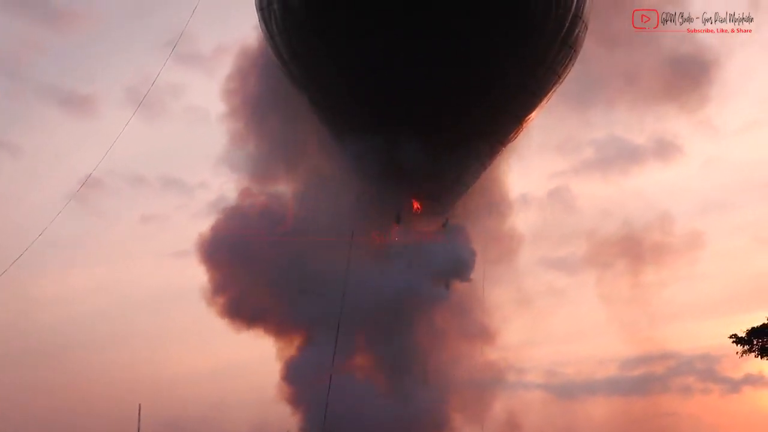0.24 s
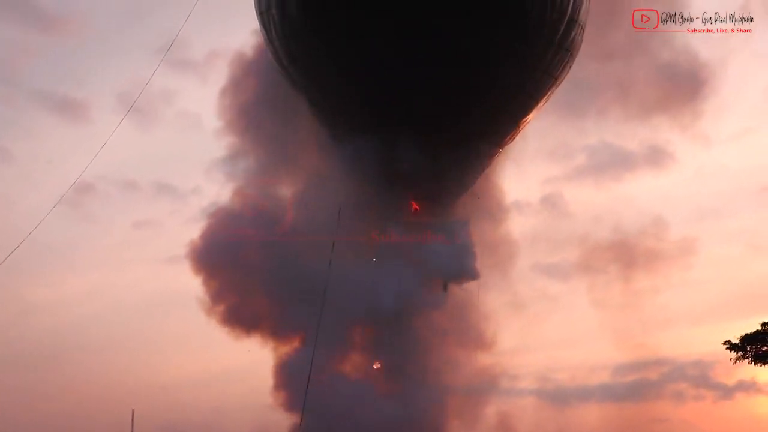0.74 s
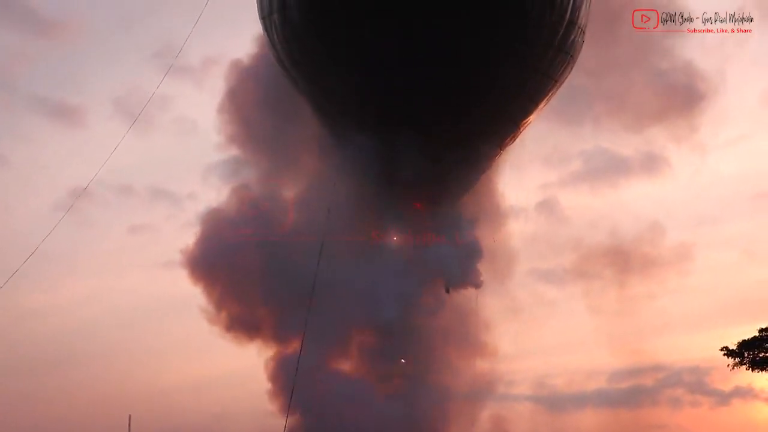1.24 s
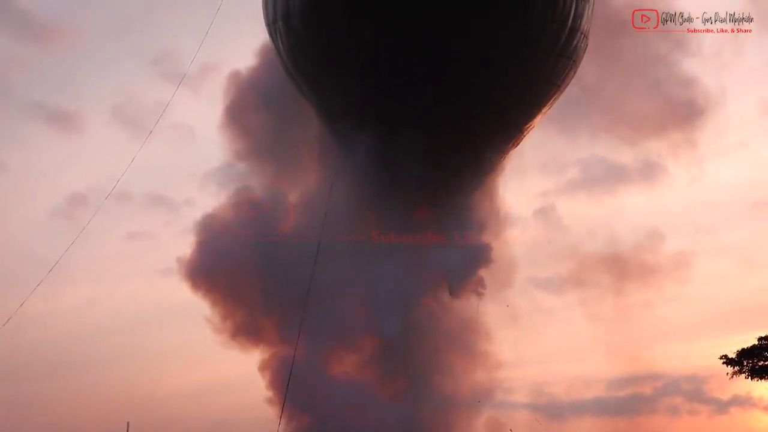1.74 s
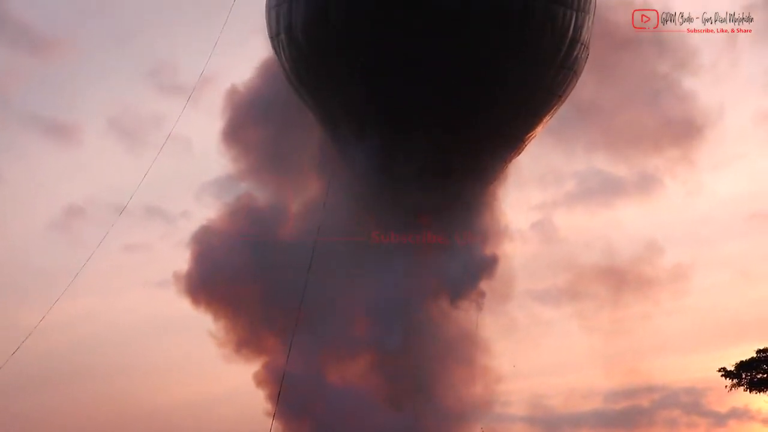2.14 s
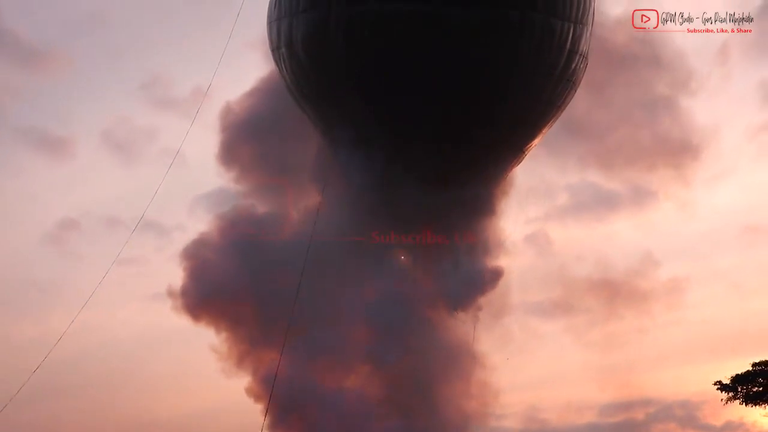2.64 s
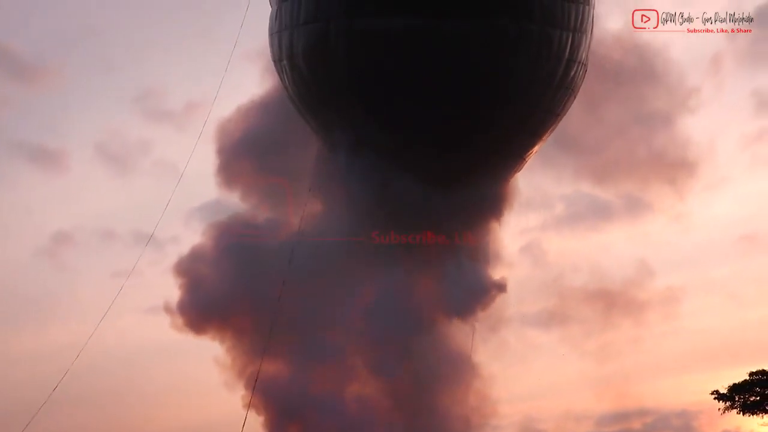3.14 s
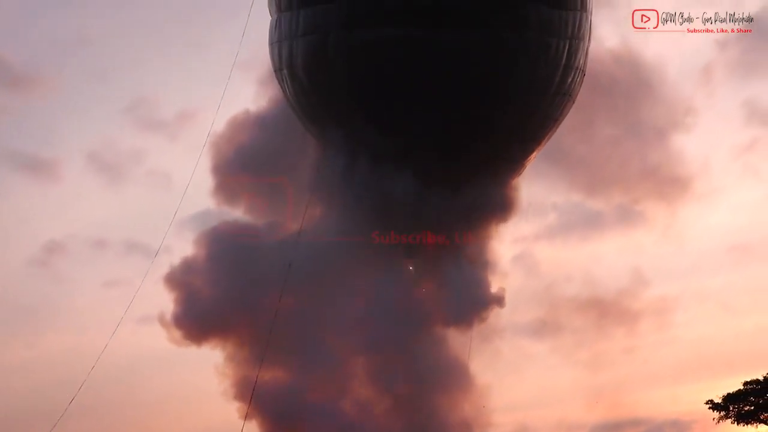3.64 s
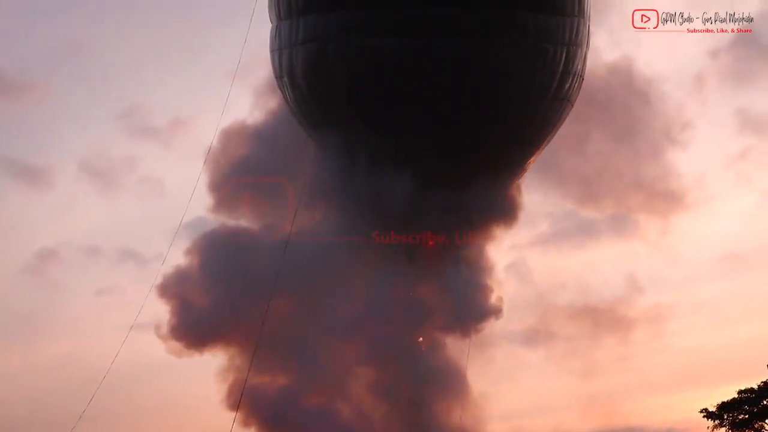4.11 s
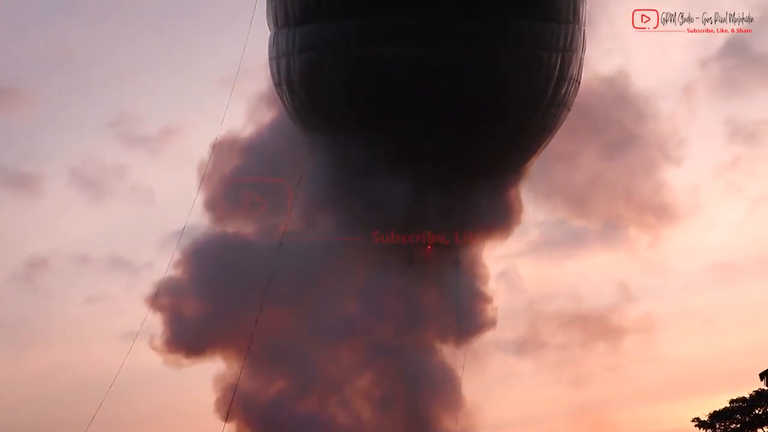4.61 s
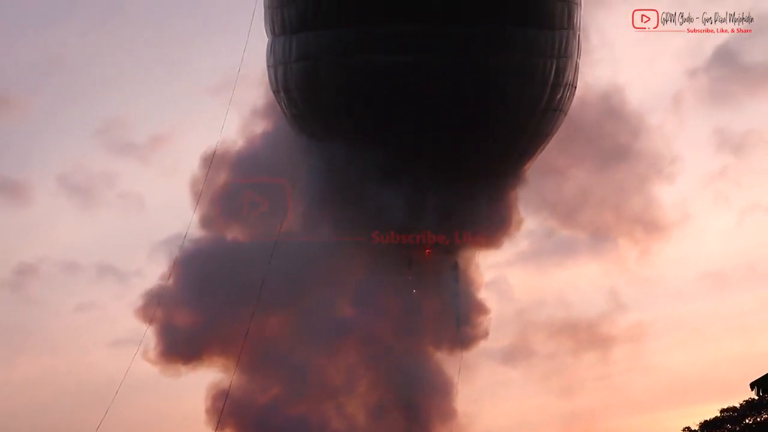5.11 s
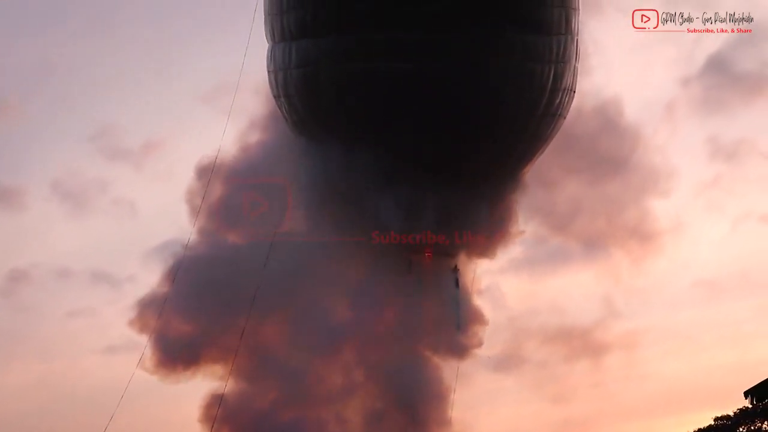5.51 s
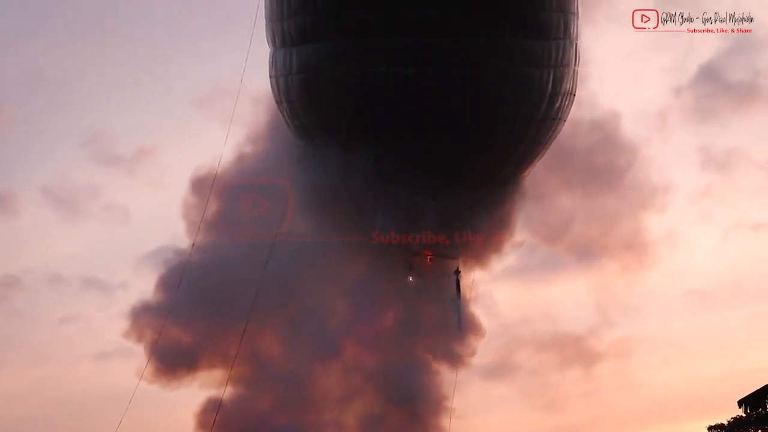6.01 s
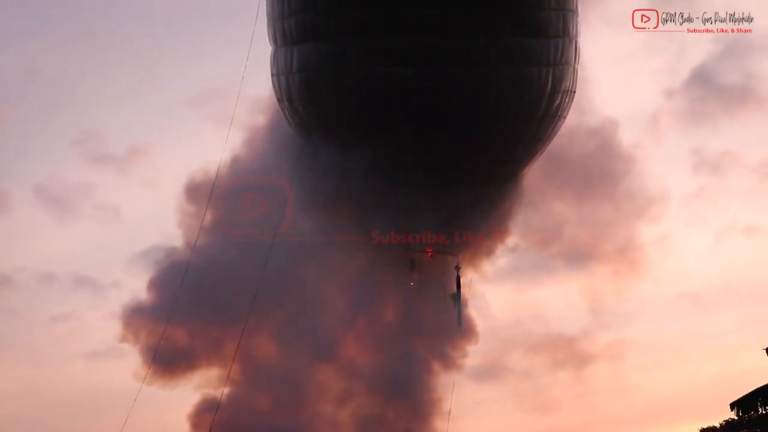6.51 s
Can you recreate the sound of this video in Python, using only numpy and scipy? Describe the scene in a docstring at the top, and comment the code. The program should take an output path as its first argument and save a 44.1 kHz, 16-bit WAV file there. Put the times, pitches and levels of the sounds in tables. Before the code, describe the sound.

Firecracker strings explode over an open field in uneven volleys. Each bang has a sharp snap, a short hollow thump and a little low push, followed by slapback and a grainy, quickly fading scatter of echoes. The opening is busy, the middle thins to separate pops, then a dense burst hits around four seconds and clusters continue to the end. The microphone slightly overloads on the loudest peaks; only a faint outdoor wash lies beneath.

```python
"""Strings of firecrackers go off in ragged volleys over an open field, thickest around four seconds.
Each blast starts with a sharp shock front, then a short swinging thump, a deep push and a ground bounce.
A slap, a few echoes and a grainy tail of scattered sound follow, and sink into a faint outdoor wash.
The microphone overloads on the loudest peaks, and a noise suppressor turns down what is very quiet."""
import sys
import numpy as np
from scipy import signal
from scipy.io import wavfile
from scipy.ndimage import uniform_filter1d

SR = 44100
rng = np.random.default_rng(int(sys.argv[2]) if len(sys.argv) > 2 else 0)


def master(y):
    """Save y as 16-bit WAV."""
    cut = np.clip(np.atleast_2d(y).T, -1, 1)
    pcm = np.round(cut * 32767)  # scale
    wavfile.write(sys.argv[1], SR, pcm.astype(np.int16))


N = 298116
BLAST = np.arange(2048) / SR  # the clock of one short blast sound (s)
BLAST_WINDOW_S = .005  # blast levels are energies spread over this time


def amp(db):
    """Turns decibels into a gain."""
    return 10 ** (np.asarray(db) / 20)


def read(points, hz):
    """Reads a table between its rows, on a log-frequency axis."""
    f, value = np.transpose(points)
    return np.interp(np.log(hz + 1), np.log(f + 1), value)


def add(mix, s, sound):
    """Adds a sound to the mix at s seconds."""
    part = mix[max(round(s * SR), 0):][:len(sound)]
    part += sound[:len(part)]


def at_level(x, db):
    """Scales a short sound so that its energy equals db held over the blast window."""
    return amp(db) * x * np.sqrt(BLAST_WINDOW_S * SR / (np.sum(x ** 2) + 1e-20))


def causal(x, gain_db):
    """Minimum-phase filter from gains round the whole frequency circle: nothing sounds before the blow."""
    log_gain = np.log(amp(gain_db))
    response = np.exp(np.conj(signal.hilbert(log_gain)))
    taps = np.fft.ifft(response).real[:len(gain_db) // 2]
    return signal.fftconvolve(x, taps)[:len(x)]


def colour(x, points, size=2048):
    """Filters a sound with the gains in a table."""
    return causal(x, read(points, abs(np.fft.fftfreq(size, 1 / SR))))


def butter(x, order, hz, kind):
    """Filters a sound with a smooth low, high or band pass."""
    return signal.sosfilt(signal.butter(order, hz, kind, fs=SR, output="sos"), x)


# colour of the distant outdoor wash: (f/Hz, relative level/dB per Hz)
WASH_COLOUR = [(30, -14.5), (120, -17), (350, -4), (850, -2.5), (1200, -18), (3500, -18.5), (5500, -37),
               (7500, -64), (16000, -79)]


def wash(level_db=-48, swell_rms_db=2):
    """Faint noise of the open field, slowly swelling as eight slow waves add up."""
    t = np.arange(N) / SR
    waves = [np.sin(2 * np.pi * (f * t + rng.random())) for f in np.geomspace(.3, 5, 8)]
    swell = sum(waves) / 2
    air = colour(rng.standard_normal(N), WASH_COLOUR) * amp(swell_rms_db * swell)
    return amp(level_db) * air / air.std()


# colour of the scattered sound: (f/Hz, relative level/dB per Hz)
SCATTER_COLOUR = [(40, -20.5), (150, -9.5), (450, 2.5), (620, -1), (880, 2.5), (1080, -5.5), (1400, -9),
                  (2900, -14), (3450, -11), (3900, -16), (5400, -21), (6800, -31.5), (9000, -26.5),
                  (16000, -39.5)]
# how long the field takes to fade by 60 dB: (f/Hz, t/s)
FIELD_FADE = [(60, 0.75), (350, 0.28), (800, 1), (1500, 0.64), (3500, 0.4), (7000, 0.35), (15000, 0.29)]


def scatter(near_db=3, near_s=0.033, cluster_db=-3, cluster_s=0.039, size=32768):
    """Echoes from many small surfaces: a near cluster, one further off, and a tail fading pitch by pitch."""
    t = np.arange(size) / SR
    strength = amp(4.2 * np.minimum(rng.exponential(1, size), 4.5))
    sizes = strength * (rng.random(size) < 4000 / SR)  # about 4000 echoes a second
    onset = 1 - np.exp(-t / .002)
    near = amp(near_db) * np.exp(-t / near_s)
    further = amp(cluster_db) * np.exp(-((t - cluster_s) / .012) ** 2)
    echoes = rng.standard_normal(size) * sizes * onset * (1 + near + further)
    hz, when, z = signal.stft(echoes, SR, nperseg=256)
    fade = amp(-60 * when / read(FIELD_FADE, hz)[:, None])
    tail = signal.istft(z * fade, SR, nperseg=256)[1]
    return colour(tail, SCATTER_COLOUR)


def slap(hz=1380, peak_s=0.0065):
    """A hollow slap comes back from a nearby surface, never quite at the same pitch."""
    hz = hz * rng.normal(1, .07)
    return np.sin(2 * np.pi * hz * BLAST) * BLAST / (2 * peak_s) * np.exp(-BLAST / peak_s)


def boom(low_hz=60, top_hz=330, decay_s=0.005, rise_s=0.0026):
    """Low rumble from the ground close by, just after a blast: filtered noise that swells and fades."""
    low = butter(rng.standard_normal(len(BLAST)), 2, [low_hz, top_hz], "band")
    return low * np.exp(-BLAST / decay_s) * (1 - np.exp(-(BLAST / rise_s) ** 2))


def shock(t, length):
    """Blast wave: a jump in pressure, then a longer suction."""
    u = np.maximum(t, 0) / length
    return (t >= 0) * (1 - u) * np.exp(-u)


def push(length_s=0.0013, low_hz=55, top_hz=220):
    """The deep part of the blast wave: a hump of pressure, then a long suction."""
    return butter(shock(BLAST, length_s), 1, [low_hz, top_hz], "band")


def ring(hz=750, decay_s=0.0036, spread=0.087, steep=5.4):
    """A hollow, quickly damped note that rides on the thump."""
    hz = hz * np.exp(spread * rng.standard_normal())
    return np.sin(2 * np.pi * hz * BLAST) * np.exp(-(BLAST / decay_s) ** steep)


def thump(hz, cycles=1.23, start=1.156, settle=0.97, low_hz=70):
    """The expanding gas swings the pressure about one and a half times, slowing as it goes."""
    age = BLAST * hz  # in cycles of the final pitch
    turns = age + (start - 1) * settle * (1 - np.exp(-age / settle))
    fade = np.exp(-(age / (cycles * rng.uniform(.85, 1.15))) ** 4)
    return butter(np.sin(2 * np.pi * turns) * fade, 1, low_hz, "high")


# colour of the shock front: (f/Hz, relative level/dB)
CRACK_COLOUR = [(100, -38), (700, -14.5), (1100, 1), (1450, 0.5), (2200, -4.5), (3400, -5), (5400, -15.5),
                (6700, -26.5), (8000, -13.5), (11000, -12.5), (13500, -21.5), (16000, -18.5)]


def crack(length_s=0.00019, ground_hz=5000, grit=0.12):
    """The shock front, its duller bounce off the ground and the grit of the bursting paper."""
    length_s = length_s * np.exp(0.11 * rng.standard_normal())
    bounce = butter(shock(BLAST - rng.uniform(.0008, 0.0022), length_s), 1, ground_hz, "low")
    shreds = grit * rng.standard_normal(len(BLAST)) * np.exp(-BLAST / .001)
    return colour(shreds - shock(BLAST, length_s) - .5 * bounce, CRACK_COLOUR)


# typical depth of the humps and dips in a casing's colour: (f/Hz, level/dB)
CASING_HUMPS = [(500, 0.5), (1400, 4.5), (2500, 7), (8000, 7.5), (16000, 4)]
# how much of a crack's brightness each pitch takes: (f/Hz, share)
BRIGHT_SHARE = [(1800, 0), (4500, 1)]
# how much of the drifting treble level each pitch takes: (f/Hz, share)
AIR_SHARE = [(4000, 0), (9000, 1)]


def tint(bright_db, hollow_db, treble_db, dip_db=-18, peak_db=6, hollow_hz=790, hollow_width_hz=220, size=1024):
    """No two casings burst alike: treble tilts, a hollow hump, and random humps and dips (all in dB)."""
    hz = abs(np.fft.fftfreq(size, 1 / SR))
    knots = np.cumsum(rng.uniform(140, 400, 100))  # pitches of the humps and dips (Hz)
    humps_db = read(CASING_HUMPS, knots) * rng.standard_normal(len(knots))
    humps_db = np.clip(humps_db, dip_db, peak_db)
    hollow = np.exp(-((hz - hollow_hz) / hollow_width_hz) ** 2)
    tilt_db = bright_db * read(BRIGHT_SHARE, hz) + treble_db * read(AIR_SHARE, hz)
    return np.interp(hz, knots, humps_db) + tilt_db + hollow_db * hollow


# an ordinary firecracker, against which the others are reckoned
USUAL_HZ, USUAL_THUMP_DB, USUAL_RING_DB, USUAL_CRACK_DB = 345, -9, -15, -17
# the deep push of an ordinary blast (dB), its growth per dB of thump, and per octave of lower pitch (dB)
PUSH_DB, PUSH_PER_THUMP, PUSH_DB_PER_OCTAVE = -23.5, 0.12, 11.5
BOOM_DB = 0  # ground rumble, against the push
# the scattered tail of an ordinary blast (dB), and its growth per dB of thump and per dB of crack
TAIL_DB, TAIL_PER_THUMP, TAIL_PER_CRACK = -16.5, 0.46, 0.27
# blasts in quick succession have weaker tails: by how much, and how soon that passes
CROWDED_DB, CROWDED_S = -4, 0.16
# one hard echo from close by: delay, level, share of the thump that returns
ECHO_S, ECHO_DB, ECHO_BODY = 0.017, -27.5, 0.8
# stray echoes of the crack: earliest and latest delay, level, and how fast they weaken with delay
STRAY_FROM_S, STRAY_TO_S, STRAY_DB, STRAY_FADE_S = 0.016, 0.15, -24.5, 0.052
# slow changes in what the surroundings send back: (t/s, tail level/dB, treble level/dB)
# the treble level colours the crack as well
SURROUNDINGS = [(0, 2, -1), (0.5, 1, -3.5), (1.1, 3.5, -5), (1.6, 0, 0), (2.3, 1, -1.5), (2.9, 3.5, -1.5),
                (3.4, -1, 2), (4.1, 2.5, 0.5), (4.7, 1.5, 0), (5.2, 1.5, -3), (5.8, 1.5, 1.5),
                (6.7, 0.5, 1)]
# one row a firecracker: (t/s, thump level/dB, thump f/Hz, hollow ring level/dB, crack level/dB)
FIRECRACKERS = [(0.0089, -4.5, 387, -19, -11), (0.012, -20, 430, -14.5, -35),
                (0.1041, -12.5, 280, -18, -17), (0.1876, -6, 344, -16.5, -15),
                (0.2034, -49, 275, -16, -19.5), (0.2456, -7.5, 326, -9, -11.5), (0.2749, -6, 294, -18, -10),
                (0.285, -16.5, 436, -23, -22), (0.3641, -3, 356, -27, -9.5), (0.3803, -32, 295, -28, -26),
                (0.4093, -10, 355, -12.5, -14.5), (0.4181, -10.5, 324, -19, -14.5),
                (0.4336, -14, 375, -10, -11), (0.438, -7.5, 315, -15, -13), (0.524, -22, 300, -38, -21),
                (0.5915, -6.5, 315, -10.5, -15), (0.6411, -8, 280, -11, -8.5),
                (0.646, -5.5, 386, -10, -12.5), (0.6663, -3, 345, -8, -8.5), (0.6858, -8, 370, -10, -10.5),
                (0.7002, -4.5, 347, -32, -10.5), (0.7595, -16, 312, -17.5, -17.5),
                (0.8098, -2.5, 300, -13, -12), (0.9236, -13.5, 303, -22, -24),
                (0.9499, -7, 366, -12, -16.5), (0.9546, -8, 358, -20, -14.5), (0.9709, -7, 383, -20, -11.5),
                (0.9827, -10.5, 347, -12, -16), (0.99, -13, 376, -26, -15),
                (1.0565, -12.5, 430, -11.5, -15.5), (1.0781, -2, 356, -26, -12.5),
                (1.108, -18, 424, -8.5, -13), (1.113, -11.5, 385, -14, -13),
                (1.3748, -7, 320, -22.5, -12.5), (1.4166, -5.5, 357, -15, -11.5),
                (1.482, -12, 338, -11, -12.5), (1.4846, -3.5, 335, -30, -9),
                (1.4994, -11.5, 370, -12.5, -13), (1.5208, -7.5, 395, -21, -10),
                (1.5297, -10.5, 271, -16, -16.5), (1.5866, -5, 360, -10, -8.5),
                (1.6115, -26, 325, -34, -18), (1.619, -9, 343, -13, -14), (1.6871, -8.5, 338, -11, -15),
                (1.8013, -18, 285, -20, -33.5), (1.86, -6.5, 323, -30, -21.5), (1.886, -6.5, 355, -10, -13),
                (1.917, -34, 350, -20, -21), (1.9298, -8.5, 370, -12, -18), (1.983, -18, 300, -24, -26),
                (2.0451, -7.5, 372, -18.5, -15), (2.1338, -8.5, 350, -23, -20),
                (2.2045, -20, 310, -30, -32.5), (2.2501, -22.5, 315, -40, -26.5),
                (2.2562, -5, 330, -24, -16.5), (2.3584, -11.5, 360, -24, -19), (2.391, -16, 345, -16, -20),
                (2.4372, -8.5, 400, -10, -17), (2.4592, -11.5, 440, -11, -17), (2.581, -7.5, 375, -9, -18),
                (2.7458, -16.5, 203, -28, -30.5), (2.7739, -14, 226, -47, -19.5),
                (2.7893, -32, 221, -31, -19), (2.827, -29, 240, -23, -17), (2.894, -11, 318, -9, -15.5),
                (2.9, -17.5, 272, -31, -21), (2.9636, -9, 392, -9, -12), (3.0114, -16, 380, -8.5, -16),
                (3.057, -10.5, 370, -11, -15.5), (3.0848, -31, 305, -18, -30),
                (3.1138, -7.5, 320, -10.5, -13.5), (3.1915, -10.5, 330, -12.5, -18.5),
                (3.203, -35, 300, -28, -46), (3.2276, -6, 325, -11.5, -15.5), (3.3711, -6, 285, -11, -16),
                (3.4777, -7, 296, -9.5, -13.5), (3.5425, -8, 413, -12, -15.5),
                (3.7283, -9.5, 328, -16, -17.5), (3.7995, -12.5, 370, -14.5, -15.5),
                (3.9435, -8.5, 335, -15, -18), (3.9646, -2, 374, -7.5, -8), (3.9907, -10, 310, -12, -12),
                (3.995, -4, 350, -11, -9), (4.0027, -7, 337, -12, -13), (4.0213, -6, 392, -12, -13),
                (4.037, -8.5, 388, -13, -8.5), (4.0416, -6.5, 325, -16, -10),
                (4.0614, -6.5, 366, -28, -13.5), (4.3077, -9.5, 246, -8.5, -8), (4.3283, -6, 395, -10, -10),
                (4.332, -13, 298, -7, -19), (4.3475, -14, 404, -18, -14), (4.3625, -6, 383, -33, -12.5),
                (4.3711, -3, 325, -14, -9), (4.5105, -9, 365, -14, -18.5), (4.5403, -15, 412, -14, -19),
                (4.5464, -18, 285, -13.5, -14.5), (4.5784, -5, 384, -13, -12.5),
                (4.588, -4.5, 380, -23, -12.5), (4.7118, -6.5, 373, -11.5, -17),
                (4.8729, -8.5, 402, -22, -19), (4.9082, -4.5, 353, -8, -11), (4.9641, -9, 373, -13, -18),
                (5.0447, -6.5, 357, -13, -16), (5.05, -14, 313, -16, -17.5), (5.0783, -7, 327, -12, -14),
                (5.1667, -16, 297, -13.5, -19.5), (5.2539, -11.5, 390, -22.5, -17.5),
                (5.3471, -8.5, 363, -13.5, -16.5), (5.4474, -7, 332, -14, -16),
                (5.4772, -12, 295, -19, -22), (5.5234, -6.5, 376, -15, -13.5),
                (5.5932, -6, 346, -13.5, -15), (5.6975, -5, 380, -43, -17), (5.702, -6, 317, -13.5, -18),
                (5.7119, -13, 363, -22, -24), (5.891, -20, 272, -19.5, -20.5), (5.9062, -8, 280, -22, -16),
                (5.9123, -6, 338, -9.5, -14), (5.9238, -7.5, 368, -9, -15), (5.9778, -11.5, 332, -16, -15),
                (5.992, -8, 384, -12, -12), (6.0012, -6, 396, -15, -14.5), (6.0521, -6.5, 358, -12.5, -14),
                (6.13, -6.5, 350, -13.5, -17), (6.1638, -6.5, 394, -10, -18),
                (6.2177, -8, 400, -7.5, -19.5), (6.3286, -9.5, 315, -18, -32.5),
                (6.3699, -5, 308, -21, -26.5), (6.5364, -12, 295, -18.5, -20),
                (6.5626, -6, 355, -19.5, -13.5), (6.6012, -7.5, 373, -13, -13),
                (6.6144, -3.5, 383, -26, -12), (6.6211, -23, 298, -23, -17.5),
                (6.646, -19, 317, -14.5, -14), (6.6499, -8.5, 346, -13, -14),
                (6.7146, -14.5, 323, -15, -16.5)]


def blasts(front_colour=1.0, slap_db=-17.0, snap_tilt=0.35, hollow_share=0.34,
           thump_lag_s=0.00023, push_lag_s=0.00044):
    """Every blast with its scattered tail, a slap, one hard echo from close by and a few stray ones."""
    out = np.zeros(N)
    tails = [scatter() for _ in range(24)]  # shared out in turn
    when, *drift = np.transpose(SURROUNDINGS)
    pauses = abs(np.diff([row[0] for row in FIRECRACKERS], prepend=-1))
    for k, (row, pause) in enumerate(zip(FIRECRACKERS, pauses)):
        s, thump_db, hz, ring_db, crack_db = row
        # how far this one departs from the ordinary (dB)
        heavier = thump_db - USUAL_THUMP_DB
        hollower = ring_db - USUAL_RING_DB
        sharper = crack_db - USUAL_CRACK_DB
        # lower-pitched blasts push more air
        deep_db = PUSH_DB + PUSH_PER_THUMP * heavier + PUSH_DB_PER_OCTAVE * np.log2(USUAL_HZ / hz)
        wet_db, treble_db = (np.interp(s, when, curve) for curve in drift)
        tail_db = TAIL_DB + TAIL_PER_THUMP * heavier + TAIL_PER_CRACK * sharper
        tail_db += CROWDED_DB * np.exp(-pause / CROWDED_S) + wet_db

        # a blast with little thump has a brighter snap
        casing = tint(snap_tilt * (sharper - heavier), hollow_share * hollower, treble_db)
        front = at_level(causal(crack(), front_colour * casing), crack_db)
        body = at_level(thump(hz), thump_db) + at_level(ring(), ring_db)
        deep = at_level(push(), deep_db) + at_level(boom(), deep_db + BOOM_DB)
        add(out, s, front)
        add(out, s + thump_lag_s, body)
        add(out, s + push_lag_s, deep)

        # the surroundings answer with the colour of the same casing
        add(out, s, at_level(causal(tails[k % len(tails)], casing), tail_db))
        add(out, s + rng.uniform(.015, .036), at_level(slap(), tail_db + rng.normal(slap_db, 3)))
        add(out, s + rng.normal(ECHO_S, .0005), amp(ECHO_DB) * (front + ECHO_BODY * body))
        delays = rng.uniform(STRAY_FROM_S, STRAY_TO_S, 4)
        for delay, size_db in zip(delays, rng.normal(STRAY_DB, 3, 4)):
            add(out, s + delay, amp(size_db) * front * np.exp(-delay / STRAY_FADE_S))
    return out


# threshold below which the noise suppressor turns a band down: (f/Hz, level/dB)
HUSH_THRESHOLD = [(100, -89), (800, -44.5), (1300, -58), (3500, -69), (7000, -91.5), (16000, -102)]


def suppress(x, size=1024, least_gain=.25):
    """Noise suppressor: every band fades, down to a least gain, once it sinks under its threshold."""
    overlap = size * 3 // 4
    hz, _, z = signal.stft(x, SR, nperseg=size, noverlap=overlap)
    # smooth the power over neighbouring pitches, then over time
    power = uniform_filter1d(abs(z) ** 2, size=5, axis=-2)
    power = uniform_filter1d(power, size=5, axis=-1)
    gain = power / (power + amp(read(HUSH_THRESHOLD, hz))[:, None] ** 2)
    return signal.istft(z * np.maximum(gain, least_gain), SR, nperseg=size, noverlap=overlap)[1][:, :N]


def scene():
    """Firecrackers over the field, with its faint wash."""
    return (blasts() + wash())[None]


def record(dry, dip_hz=1050, dip_width_hz=230, dip_db=-6, ceiling=.96, edge_hz=16300):
    """The microphone dips in the midrange and rounds off peaks; then noise suppressor and band limit."""
    midrange = signal.lfilter(*signal.iirpeak(dip_hz, dip_hz / dip_width_hz, fs=SR), dry)
    dipped = dry - (1 - amp(dip_db)) * midrange
    squashed = dipped / (1 + (dipped / ceiling) ** 8) ** (1 / 8)
    band_limit = signal.firwin(255, edge_hz, window=("kaiser", 9), fs=SR)
    return signal.oaconvolve(suppress(squashed), band_limit[None], "same")


dry = scene()
out = record(dry)
master(out)
```